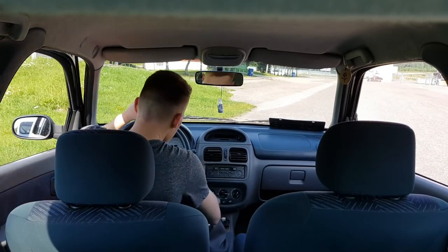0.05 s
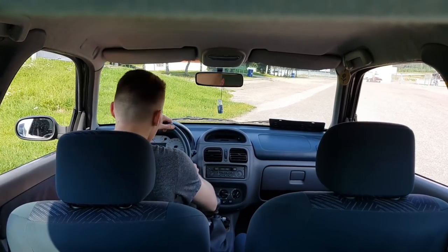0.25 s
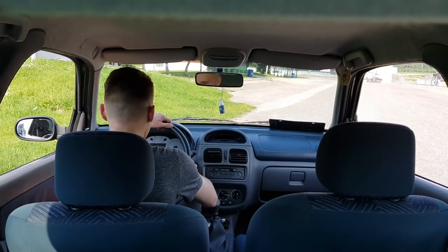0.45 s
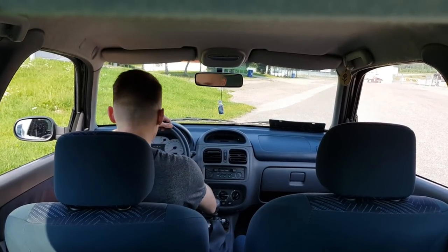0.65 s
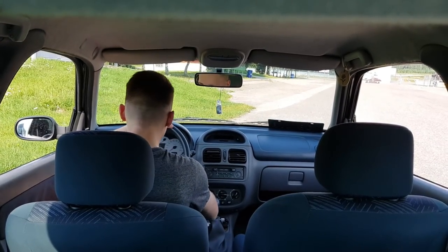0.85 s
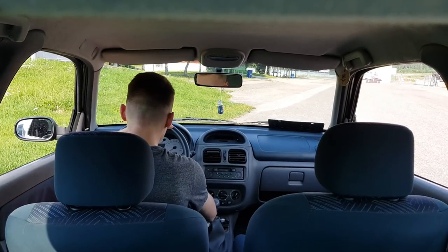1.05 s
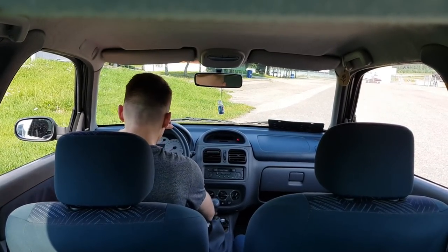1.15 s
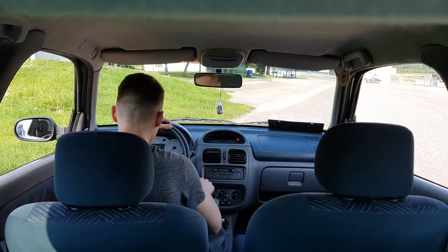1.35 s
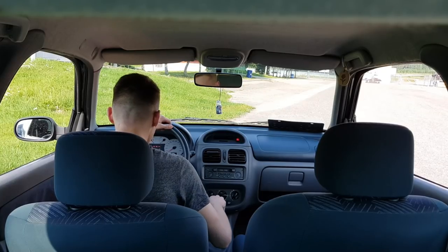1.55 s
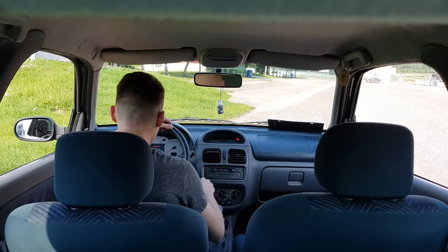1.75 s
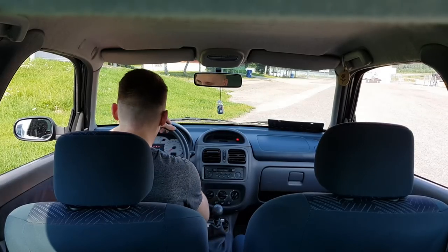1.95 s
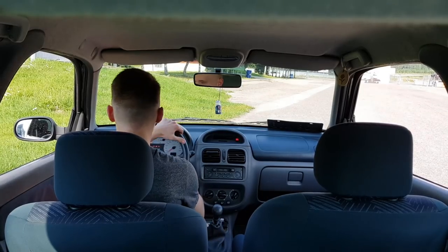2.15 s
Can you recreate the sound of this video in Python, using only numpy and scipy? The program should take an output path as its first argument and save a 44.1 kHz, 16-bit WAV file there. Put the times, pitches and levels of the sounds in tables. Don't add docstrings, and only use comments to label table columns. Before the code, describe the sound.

A car door gives a brief hinge squeak and slams with a boomy thud and trim rattle; then the driver shifts in the seat and keys jingle against the plastic steering column, heard from the back seat.

```python
import sys
import numpy as np
from scipy import signal
from scipy.fft import rfft, irfft, next_fast_len
from scipy.io import wavfile
from scipy.ndimage import map_coordinates

SR = 44100
rng = np.random.default_rng(int(sys.argv[2]) if len(sys.argv) > 2 else 0)


def generate_wav(signal):
    frames = np.transpose(np.atleast_2d(signal))
    scaled = np.clip(frames, -1, 1) * 32767
    pcm = np.round(scaled).astype(np.int16)
    wavfile.write(sys.argv[1], SR, pcm)


def voltage_ratio(decibels):
    exponent = np.asarray(decibels, float) / 20
    return 10 ** exponent


N = 97020
TIME = np.arange(N) / SR

# (time [s], level [dB])
RUSTLE = [
    (0, -51),
    (.5, -63),
    (.93, -66.5),
    (1.15, -56),
    (1.31, -64),
    (1.6, -57),
    (2.2, -57),
]
# (frequency [Hz], level [dB])
RUSTLE_TONE = [(240, -33), (400, -11.5), (598, -9.5), (1090, -41), (4690, -32.5), (13700, -30.5),
               (16200, -38)]
# (frequency [Hz], level [dB])
HISS_TONE = [(600, -35), (1300, -2.5), (3000, -12.5), (8000, 0.5), (15000, -8), (16200, -36)]
# (time [s], level [dB])
SEAT = [
    (0, -41),
    (.3, -34.5),
    (.7, -44),
    (.9, -43),
    (1.15, -28.5),
    (1.3, -39),
    (1.47, -38),
    (1.55, -31),
    (1.9, -31.5),
    (2.2, -36.5),
]
# (frequency [Hz], level [dB])
SEAT_TONE = [(13, -28), (22, -10.5), (172, -1.5), (340, -23), (565, -25), (859, -37.5), (1200, -41.5),
             (2200, -61.5), (4000, -120)]
# (time [s], peak level [dB], pitch [Hz])
THUMPS = [(0.08, -13.5, 152.6), (0.705, -14, 166.4), (0.943, -1, 178.6), (0.961, -11.5, 260),
          (1.044, -18.5, 145), (1.121, -29, 51.3), (1.225, -6, 207), (1.333, -14.5, 231),
          (1.349, -8.5, 138.5), (1.528, -10, 204), (1.533, -4.5, 290), (1.546, -20, 52.7),
          (1.617, -18, 52.3), (1.688, -15, 61), (1.7, -11.5, 134.5), (1.769, -4, 161), (1.819, -23.5, 62.6),
          (1.871, -3, 176), (1.901, -27, 43.7), (2.015, -9, 184.3), (2.093, -21.5, 56.6), (2.155, -27, 55)]
# (time [s], length [s], level [dB])
SHAKES = [(0.604, 0.077, -70.5), (0.707, 0.048, -53.5), (0.792, 0.087, -64), (0.941, 0.013, -59.5),
          (1.105, 0.12, -52.5), (1.288, 0.0082, -59.5), (1.325, 0.048, -63.5), (1.47, 0.068, -53.5),
          (1.563, 0.068, -60.5), (1.652, 0.12, -48), (2.006, 0.038, -52.5), (2.02, 0.035, -42.5),
          (2.079, 0.014, -39), (2.123, .1, -61.5)]
# (time [s], low modes [dB], upper modes [dB], snap [dB])
KNOCKS = [(0.651, -27, -70, -83), (0.725, -28.5, -44.5, -32), (0.939, -34.5, -57, -64.5),
          (1.088, -47.5, -48.5, -76.5), (1.107, -29, -48, -35), (1.156, -21.5, -44, -35),
          (1.179, -30.5, -52, -60), (1.223, -48, -45, -30), (1.227, -26, -32, -52), (1.252, -26, -44, -66),
          (1.336, -45, -61, -59), (1.415, -40, -45.5, -70), (1.483, -28, -20.5, -25),
          (1.489, -23, -18, -31), (1.498, -16.5, -39, -38), (1.598, -28, -40.5, -70),
          (1.886, -45, -55, -70), (2.037, -25.5, -33, -25.5), (2.048, -23, -31, -42),
          (2.091, -23, -17.5, -18.5), (2.102, -15.5, -37, -43), (2.129, -31, -24.5, -34)]
# (frequency [Hz], level [dB], t60 [s])
KNOCK_MODES = [(590, 4.5, 0.053), (671.4, -6, 0.08), (1083, -8.5, 0.032), (1545, -21, .02), (1946, -27, 0.043)]
# (frequency [Hz], level [dB])
SNAP = [(900, -38), (2000, -22), (2800, -15), (4400, 3), (5600, -1.5), (16000, -18.5)]
# (time [s], peak level [dB], loudest key [Hz])
JINGLES = [(0.608, -36.5, 7760), (0.7262, -30, 7720), (1.105, -42, 4840), (1.1613, -39, 10800),
           (1.2251, -38, 7770), (1.264, -37, 5040), (1.3543, -38, 12400), (1.4825, -29, 5430),
           (1.5174, -37, 10600), (1.5758, -49, 7800), (1.6192, -45, 7900), (1.661, -28.5, 13200),
           (1.6854, -28.5, 12000), (1.6935, -25.5, 15000), (1.7589, -36, 11100), (1.6645, -39, 6750),
           (1.761, -39, 7000), (2.038, -26, 8100), (2.0916, -31, 7750)]
KEYS_HZ = [6750, 7750, 9400, 10720, 11110, 12100, 13160, 14990]
# (time [s], level [dB])
FREE_KEY = [
    (1.765, -60),
    (2.1, -57),
]
# (frequency [Hz], level [dB])
CHATTER = [(1470, -29.5), (3300, -14.5), (7950, -5.5), (9800, -13.5), (10900, -3.5), (15500, -8.5),
           (16200, -65)]
# (frequency [Hz], left over right [dB])
KEY_PAN = [(3000, -9), (8000, 9), (13000, -3.5)]
# (time [s], slip rate [Hz], level [dB], overtones [dB])
SQUEAK = [
    (.128, 760, -70, -62),
    (.146, 770, -66, -56),
    (.156, 800, -54, -64),
    (.164, 840, -38, -54),
    (.173, 830, -33, -56),
    (.187, 865, -43, -59),
    (.202, 875, -40, -53),
    (.214, 915, -36, -56),
    (.226, 990, -40, -50),
]
# (multiple of slip rate [1], level [dB])
SQUEAK_TONES = [(2, -5), (3, -13), (4, -19), (5, -20)]
# (time [s], panel [dB], boom [dB], rattle [dB])
DOOR = [(0.226, -9, -6.5, -27.5), (0.228, 0.5, -40, -48.5), (0.242, -7, -7, -16), (0.261, -8.5, -4, -60),
        (0.285, -15.5, -7, -32.5), (0.305, -13, -14, -28), (0.345, -16.5, -9.5, -27),
        (0.389, -23.5, -15.5, -36), (0.423, -27.5, -17.5, -51), (0.445, -36, -46, -36.5),
        (0.499, -38.5, -50, -48.5), (.531, -48, -49, -54)]
# (frequency [Hz], level [dB], t60 [s])
CABIN = [(57.2, -1.5, 0.77), (132.6, 5.5, 0.21), (163, 4, 0.13), (232.5, -5, 0.24), (267, -10, 0.24),
         (333, -8.5, 0.17)]
# (frequency [Hz], level [dB], t60 [s])
PANEL = [(hz, db - 0.5, .06) for hz, db in [(565, 2.5), (620, 3), (745, 4), (840, -7), (950, -6),
         (1020, 1.5), (1150, -0.5)]]
# (frequency [Hz], level [dB])
RATTLE = [(710, -20.5), (1200, 0), (2000, -7.5), (3000, -14), (4650, -12.5), (12600, -28.5), (16000, -39)]
# (frequency [Hz], level [dB])
SHAKE = [(15, -57), (25, -2.5), (93, -8), (139, -2), (337, -13), (624, -18.5), (2500, -45.5), (3250, -92),
         (5500, -120)]
# (frequency [Hz], t60 [s])
SHAKE_T60 = [(60, 1.38), (150, 0.43), (1000, 0.54)]
# (frequency [Hz], t60 [s])
UPHOLSTERY = [(100, .12), (1000, .08), (10000, .05)]
# (frequency [Hz], level [dB])
WET = [(100, -22), (300, -10), (1000, -4), (2500, 1), (10000, 0)]

DOOR_LEAD_S, KEY_LEAD_S = 0.00023, 0.00008
KEYS_T60, HELD_T60, LET_GO_S = 0.065, 0.031, 1.45


def unit(x):
    return x / np.sqrt(np.mean(x ** 2) + 1e-20)


def along(points, hz):
    f, v = np.transpose(points)
    return np.interp(np.log(hz + 1), np.log(f + 1), v)


def curves(rows):
    s, *cols = np.transpose(rows)
    return [np.interp(TIME, s, c) for c in cols]


def wobble(rate):
    return map_coordinates(rng.standard_normal(400), [TIME * rate])


def filtered(x, response):
    m = next_fast_len(N + SR // 2)
    return irfft(rfft(x, m) * response(np.fft.rfftfreq(m, 1 / SR)), m)[..., :N]


def noise(spectrum, channels=1):
    white = rng.standard_normal((channels, N))
    return unit(filtered(white, lambda hz: voltage_ratio(along(spectrum, hz))))


def fading(s, t60, rise_s):
    out, t = np.zeros(N + SR), TIME[:int(2 * t60 * SR)]
    out[round(s * SR):][:len(t)] = voltage_ratio(-60 * t / t60) * (1 - np.exp(-t / rise_s))
    return out[:N]


def ring(s, modes, spread_db, rise_s, detune=0.023):
    hz, db, t60 = np.transpose(modes)[..., None]
    level, tuning, phase = rng.standard_normal((3, len(modes), 1))
    t = TIME[:int(min(t60.max(), 1) * SR)]
    decay = voltage_ratio(db + spread_db * level - 60 * t / t60)
    wave = decay * np.sin(2 * np.pi * hz * (1 + detune * tuning) * t + 2 * phase)
    out = np.zeros(N + SR)
    out[round(s * SR):][:len(t)] = wave.sum(0) * (1 - np.exp(-t / rise_s)) ** 2
    return out[:N]


def resonant(x, modes):
    def response(f):
        return sum(voltage_ratio(db) * 1j * f * (1.53 / t60) / (c * c - f * f + 1j * f * 1.49 / t60)
                   for c, db, t60 in modes)
    return filtered(x, response)


def tail(t60s, seconds, channels):
    white = rng.standard_normal((channels, int(seconds * SR)))
    hz, t, z = signal.stft(white, SR, nperseg=512)
    out = signal.istft(z * voltage_ratio(-60 * t / along(t60s, hz)[:, None]), SR, nperseg=512)[1]
    return out / np.linalg.norm(out[0])


def placed(x, lead_s, pan, wet_db):
    side = np.array([[.5], [-.5]])
    direct = filtered(x, lambda hz: voltage_ratio(side * along(pan, hz) - 1.5) * np.exp(2j * np.pi * side * lead_s * hz))
    wet = signal.fftconvolve(x[None], tail(UPHOLSTERY, .25, channels=2), axes=1)[:, :N]
    return direct + filtered(wet, lambda hz: voltage_ratio(wet_db + along(WET, hz)))


def air():
    level_db, = curves(RUSTLE)
    rustle = voltage_ratio(level_db + 3 * wobble(16.38)) * noise(RUSTLE_TONE, channels=2)
    hiss = voltage_ratio(-69.5) * noise(HISS_TONE, channels=2)
    openings = [(657, 5, 0.033), (1006, -5.0, 0.032), (1400, -30.0, 0.03)]  # Hz, dB, t60 s
    street = unit(resonant(rng.standard_normal((2, N)), openings))
    return rustle + hiss + voltage_ratio(-47) * street * (TIME < DOOR[0][0])


def pump():
    on = np.clip((TIME - 1.53) / .1, 0, 1)
    level = voltage_ratio(-37 + 2.9 * wobble(11.68))
    return level * on * np.sin(2 * np.pi * np.cumsum(249 + 1.76 * wobble(7.43)) / SR)


def driver():
    level_db, = curves(SEAT)
    out = voltage_ratio(level_db + 2.35 * wobble(12.0) + 3.9 * wobble(35.42)) * noise(SEAT_TONE)[0]
    for s, db, hz in THUMPS:
        cushion = [(hz, 0, 9.5 / hz)]
        out += voltage_ratio(db + 8.0) * ring(s, cushion, 0, rise_s=0.012, detune=0)
    return out


def shaking():
    on = np.zeros(N)
    for s, length, db in SHAKES:
        start = np.clip((TIME - s) / 0.012, 0, 1)
        stop = np.clip((s + length - TIME) / 0.034 + 1, 0, 1)
        on += voltage_ratio(db) * start * stop
    return on * voltage_ratio(2.14 * wobble(48.69))


def column(moving):
    scrape = voltage_ratio(-6.5) * moving * (TIME < 1.6)

    def knocks(col, t60):
        return sum(voltage_ratio(row[col]) * fading(row[0], t60, 0.0011) for row in KNOCKS)

    dull, hard, sharp = knocks(1, 0.024), knocks(2, 0.016), knocks(3, 0.025)
    white = rng.standard_normal((2, N))
    low = voltage_ratio(22.5) * resonant((dull + voltage_ratio(9.5) * scrape) * white[0], KNOCK_MODES[:2])
    upper = voltage_ratio(36) * resonant((hard + scrape) * white[1], KNOCK_MODES[2:])
    return low + upper + voltage_ratio(-2.5) * (sharp + scrape) * noise(SNAP)[0]


def keys(moving):
    grit = unit(noise(CHATTER)[0] * voltage_ratio(4.5 * wobble(170)))
    out = moving * grit
    chime = resonant(out, [(hz, 0, KEYS_T60 / 2) for hz in KEYS_HZ])
    out = out + voltage_ratio(8) * (TIME > LET_GO_S) * chime
    for s, db, loud_hz in JINGLES:
        t60 = KEYS_T60 if s > LET_GO_S else HELD_T60
        struck = [(hz, -27.5 * abs(np.log2(hz / loud_hz)) ** .5, t60) for hz in KEYS_HZ]
        contact = grit * fading(s, 0.02, 0.0017)
        contact = filtered(contact, lambda f: voltage_ratio(-9 * np.abs(np.log2((f + 1) / loud_hz))))
        out += voltage_ratio(db) * ring(s, struck, 3.5, 0.00051, 0.0039) + voltage_ratio(db + 3) * contact
    for s, db in FREE_KEY:
        out += voltage_ratio(db) * ring(s, [(6530, 0.011, 0.41)], 0, 0.0023, 0)
    return out


def hinge(trim):
    hz, db, over_db = curves(SQUEAK)
    turn = 2 * np.pi * np.cumsum(hz * (1 + 0.029 * wobble(171.5))) / SR
    swing = (TIME > SQUEAK[0][0]) & (TIME < SQUEAK[-1][0])
    out = voltage_ratio(db + 13 + 4.4 * wobble(95)) * np.sin(turn)
    for k, tone_db in SQUEAK_TONES:
        out += voltage_ratio(over_db + 11 + tone_db + 5.2 * wobble(122.7)) * np.sin(k * turn)
    return swing * (out + voltage_ratio(over_db + 2) * trim)


def slam(trim):
    loose = np.clip((0.459 - TIME) / 0.032 + 1, .1, 1)
    out = np.zeros(N)
    for s, panel_db, boom_db, rattle_db in DOOR:
        if s > DOOR[1][0]:
            out += voltage_ratio(boom_db - 4.0) * ring(s, CABIN, 1.9, 0.0044)
        out += voltage_ratio(panel_db - 8.5) * ring(s, PANEL, 2.5, 0.00053)
        buzz = fading(s, 0.027, 0.00054) + 0.22 * loose * fading(s, 0.25, 0.0067)
        out += voltage_ratio(rattle_db - 0.5) * trim * buzz
    body = np.pad(tail(SHAKE_T60, 0.95, channels=1)[0], (round(DOOR[2][0] * SR), N))[:N]
    body = unit(filtered(body, lambda hz: voltage_ratio(along(SHAKE, hz))))
    return out + voltage_ratio(-22) * body * (TIME > DOOR[0][0])


def door():
    trim = noise(RATTLE)[0] * voltage_ratio(1.1 * wobble(149))
    return hinge(trim) + slam(trim)


def scene():
    moving = shaking()
    front = pump() + driver() + column(moving)
    out = air() + placed(front, KEY_LEAD_S, [(100, 1.1)], wet_db=-2.23)
    out += placed(keys(moving), KEY_LEAD_S, KEY_PAN, wet_db=3.5)
    return out + placed(door(), DOOR_LEAD_S, [(100, 1)], wet_db=-0.34)


def roll_off(x):
    return signal.sosfilt(signal.butter(12, 16510, fs=SR, output="sos"), x)


def record(dry):
    x = filtered(dry, lambda hz: (hz < 15900) & (hz > 15))
    mix = x / (1 + np.abs(x) ** 6) ** (1 / 6)
    return roll_off(mix)


dry = scene()
out = record(dry)
generate_wav(out)
```